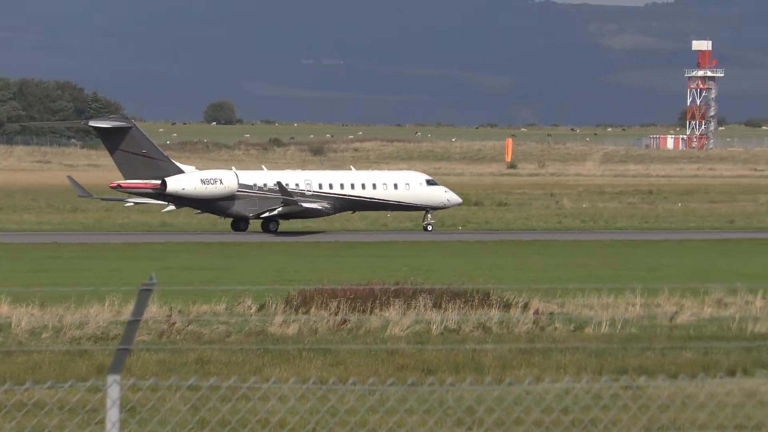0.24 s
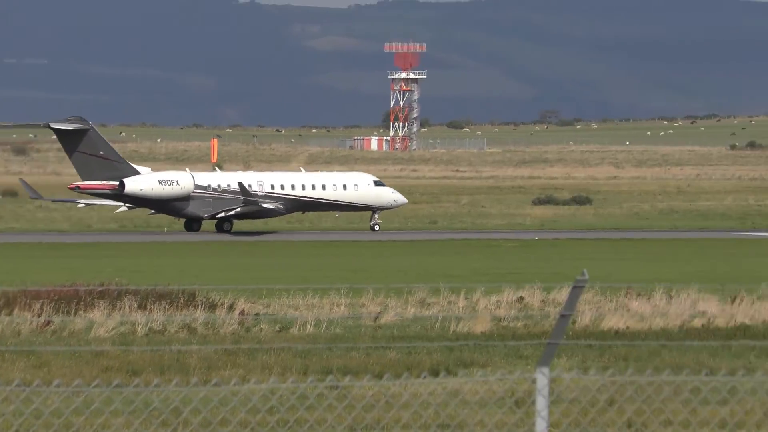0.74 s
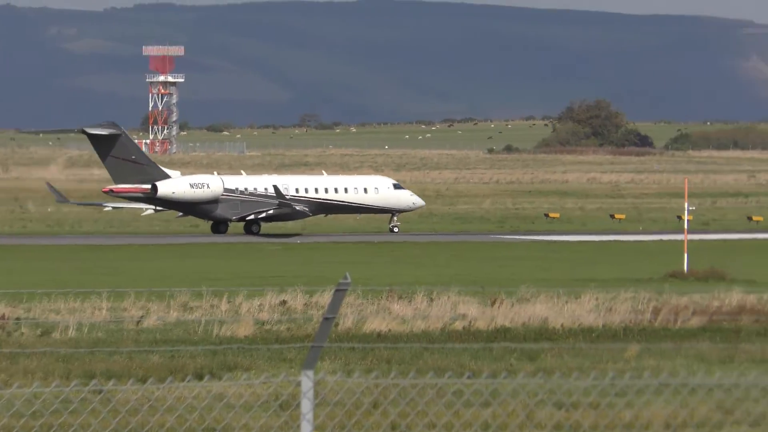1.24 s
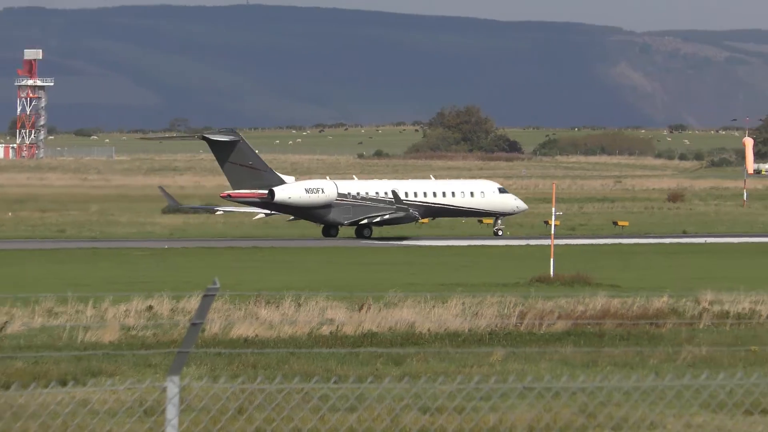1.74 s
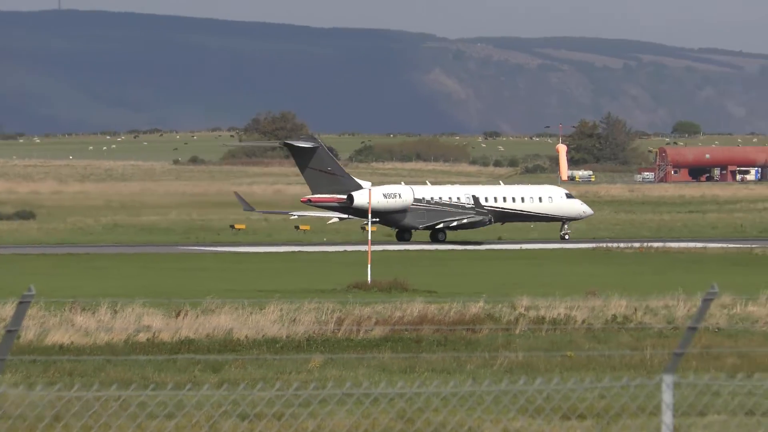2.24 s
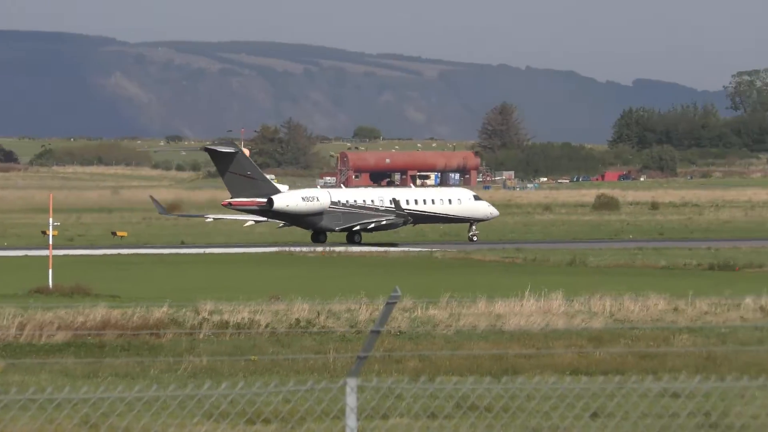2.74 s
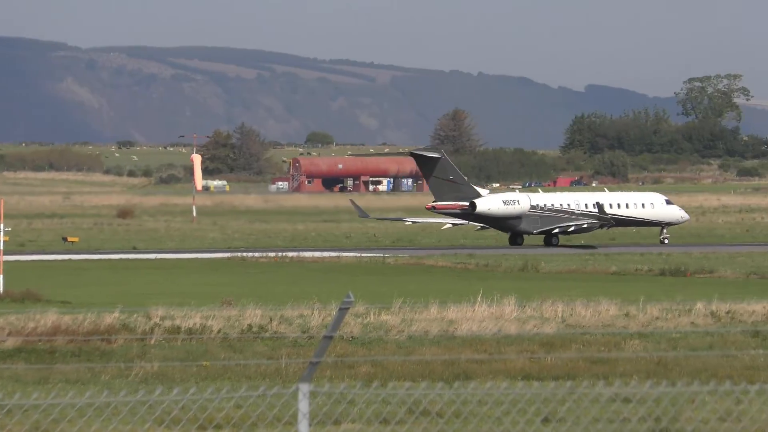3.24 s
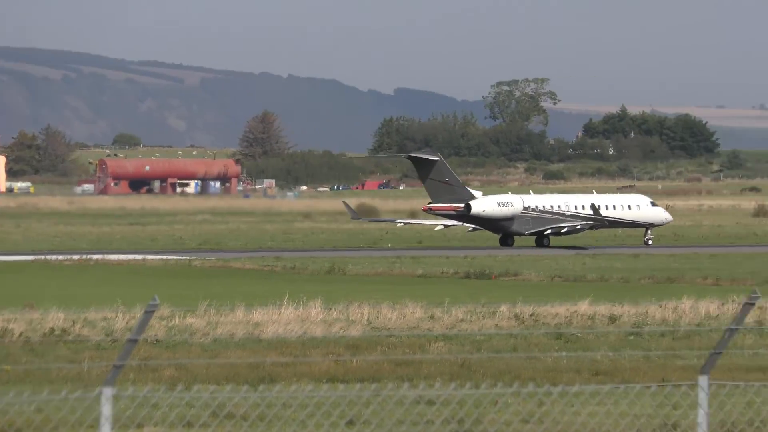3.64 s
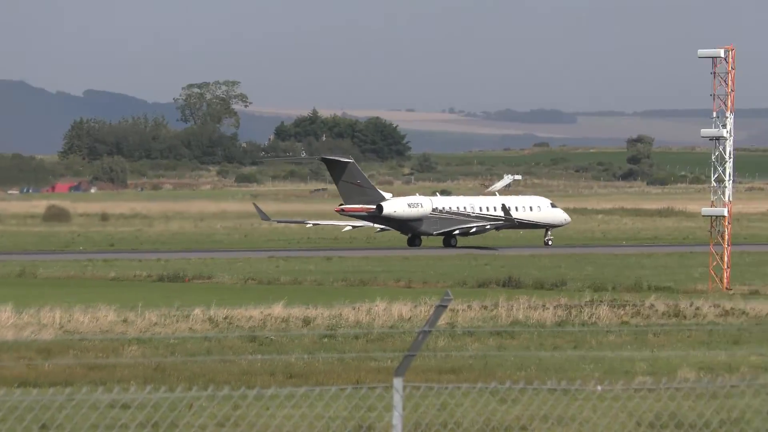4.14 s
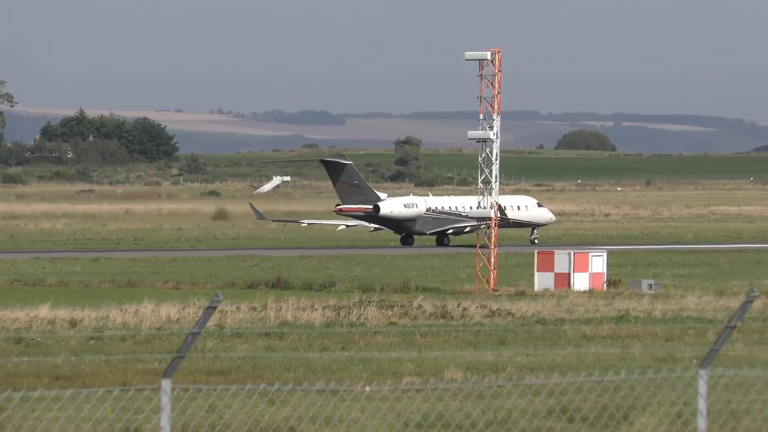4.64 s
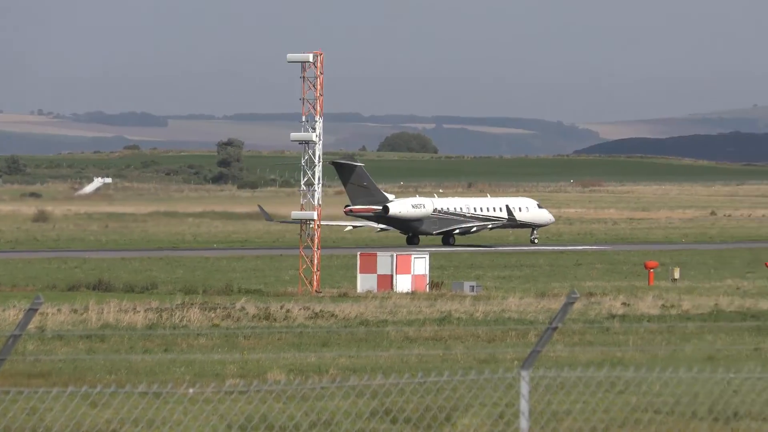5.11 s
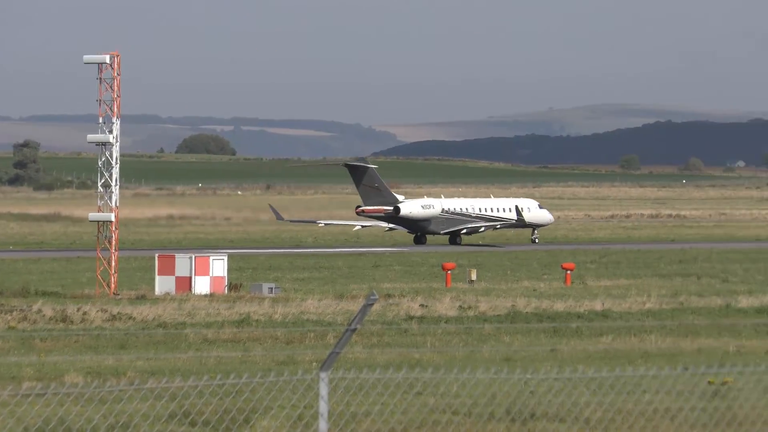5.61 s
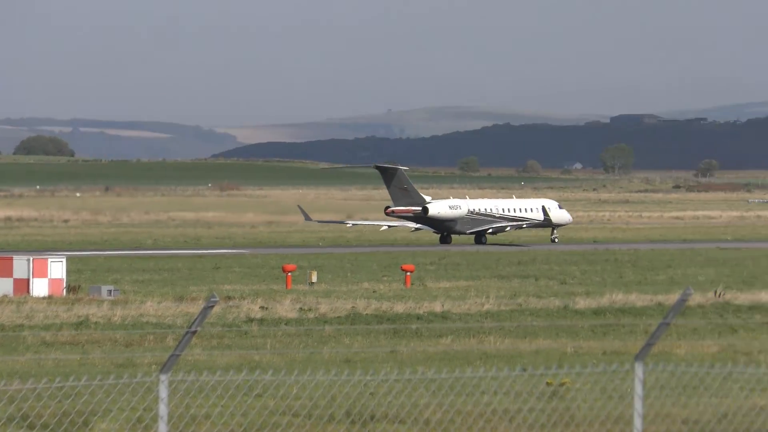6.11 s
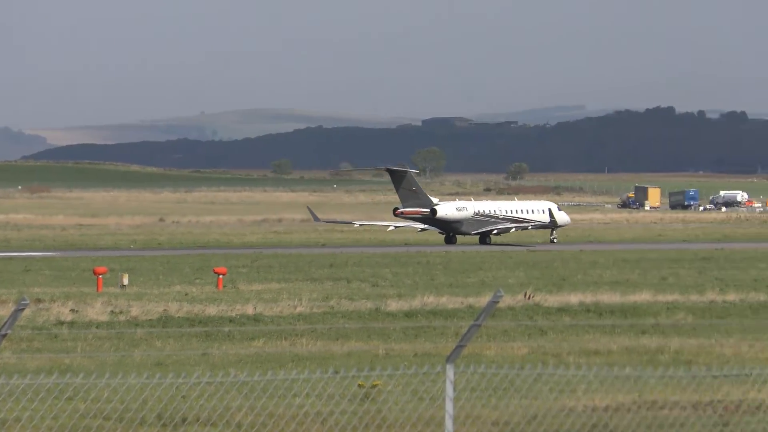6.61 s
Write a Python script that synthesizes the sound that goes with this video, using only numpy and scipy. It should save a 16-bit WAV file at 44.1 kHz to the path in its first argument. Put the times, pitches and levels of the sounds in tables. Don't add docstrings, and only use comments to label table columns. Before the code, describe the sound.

Harsh, distorted jet exhaust roar swells and sags in the wind, a faint fan whine fading as the aircraft draws away over grass.

```python
import sys
import numpy as np
from scipy import signal
from scipy.fft import rfft, irfft, next_fast_len
from scipy.io import wavfile
from scipy.ndimage import uniform_filter1d

SR = 44100
rng = np.random.default_rng(int(sys.argv[2]) if len(sys.argv) > 2 else 0)


def to_wav(s):
    ch = np.atleast_2d(s).T
    pcm = np.round(np.clip(ch, -1, 1) * 32767)
    wavfile.write(sys.argv[1], SR, pcm.astype(np.int16))


def level_to_linear(level):
    exponent = np.asarray(level, float) / 20
    return 10 ** exponent


N = 302526

LAYER_HZ = [
    70,
    155,
    350,
    720,
    1150,
    2300,
    5000,
    8500,
]


def exhaust(gains_db, patchy_db, flicker_db):
    # (pitch [Hz], level [dB per Hz])
    spectrum = [(20, -17.5), (59, 2.5), (88, -4), (110, -16), (150, -16), (250, -13.5), (490, -12),
                (900, -9.5), (2000, -14.5), (2600, -15), (3000, -25), (3660, -34), (5250, -43.5),
                (8570, -69.5)]
    # (time [s], half length [s], gain [dB], centre [Hz])
    grass_echoes = [(.5, .1, 4, 7000), (.88, .07, 4, 7000), (5.38, .08, 4, 400), (3.45, .08, -2.5, 2200),
                    (2.75, .1, 2.5, 1500), (1.0, 0.11, -3.5, 1050), (2.05, 0.11, -2.5, 1040),
                    (2.75, 0.13, -1.5, 990), (3.75, .08, -3, 1410), (4.3, 0.16, -9, 590),
                    (4.62, 0.11, -5, 1120), (5.25, 0.062, -8.5, 710), (6.35, .15, -6, 850),
                    (6.35, 0.12, -8, 2000), (6.7, 0.16, -6, 690)]
    size = next_fast_len(N)
    hz = np.maximum(np.arange(size // 2 + 1) * SR / size, 1)
    points = np.array(spectrum)
    shape_db = np.interp(np.log(hz), np.log(points[:, 0]), points[:, 1])
    shape_db -= 160 * np.maximum(np.log2(hz / points[-1, 0]), 0)
    shape_db -= 18 * np.maximum(np.log2(points[0, 0] / hz), 0)
    noise = rfft(rng.standard_normal(size)) * level_to_linear(shape_db)

    centres = 25 * 2 ** np.arange(0, 9, 1 / 3)
    echoes_db = eddies(grass_echoes, centres, octaves=0.18)
    out = 0
    below = drift(1.5)
    for k, centre in enumerate(centres):
        share = np.interp(np.log(hz), np.log(centres), np.arange(len(centres)) == k)
        place = np.interp(np.log(centre), np.log(LAYER_HZ), np.arange(len(LAYER_HZ)))
        low = min(int(place), len(LAYER_HZ) - 2)
        gain_db = gains_db[low] + (place - low) * (gains_db[low + 1] - gains_db[low])
        above = drift(3.64)
        gain_db = gain_db + echoes_db[k] + patchy_db * (below + above) + flicker_db * drift(11)
        out = out + level_to_linear(gain_db) * irfft(noise * share, size)[:N]
        below = above
    return out


def fan(upper_db):
    # (time [s], pitch [Hz], level against the upper roar [dB])
    whine = [(0, 2585, -14), (.8, 2572, -11), (1.5, 2555, -14), (2.4, 2535, -15), (3, 2520, -19),
             (3.5, 2515, -22), (6.86, 2500, -28)]
    hz, level_db = in_time(whine)
    tones = 0
    for apart_hz in (-6, 7):
        waver = level_to_linear(3.4 * drift(16))
        pitch_hz = hz + apart_hz + 4 * drift(25)
        tones = tones + waver * np.sin(2 * np.pi * np.cumsum(pitch_hz) / SR)
    return level_to_linear(upper_db + level_db) * rms_one(tones)


def eddies(rows, band_hz, octaves):
    s, half_s, gain_db, centre_hz = np.transpose(rows)[:, :, None]
    reach = np.exp(-0.5 * (np.log2(np.array(band_hz) / centre_hz) / octaves) ** 2)
    coarse = np.arange(0, N + 64, 64) / SR
    bells = gain_db * np.exp(-0.5 * ((coarse - s) / half_s) ** 2)
    bands = reach.T @ bells
    return np.array([np.interp(np.arange(N) / SR, coarse, band) for band in bands])


def drift(rate):
    r = np.exp(-80 * np.pi * rate / SR)
    slow = signal.lfilter([1], [1, -2 * r, r * r], rng.standard_normal(N // 40 + 2002))
    slow = slow[2000:]
    return np.interp(np.arange(N) / 40, np.arange(len(slow)), rms_one(slow))


def rms_one(x):
    return x / np.sqrt(np.mean(x ** 2) + 1e-20)


def in_time(rows):
    s, *columns = np.transpose(rows)
    return [np.interp(np.arange(N) / SR, s, c) for c in columns]


def scene():
    # (time [s], level [dB], dullness as mid over upper roar [dB])
    air = [(0, -11.5, -2), (.55, -11.5, -2.5), (.77, -13, -5.5), (1.07, -12, 6.5), (1.3, -8, 1.5),
           (1.55, -11, 2.5), (1.93, -16, 2), (2.16, -23, -3.5), (2.42, -21, -3.5), (2.72, -22, -11.5),
           (3.1, -15.5, -2.5), (3.42, -19, -2.5), (3.8, -25.5, -4), (4.13, -22, -4), (5.0, -22, -2.5),
           (5.58, -16, -2.5), (5.9, -21, -5.5), (6.86, -20.5, 3.8)]
    # (time [s], half length [s], gain [dB], centre [Hz])
    big_eddies = [(.5, 0.18, 5, 155), (.5, 0.21, 5, 715), (0.644, 0.22, -3, 349), (0.483, 0.047, 8.5, 6570),
                  (1.007, 0.16, 4, 555), (1.3, 0.23, 5, 350), (1.4, 0.07, 4.5, 5020),
                  (1.458, 0.24, -6.5, 156), (1.904, .12, -1.5, 5000), (2.35, 0.18, 4, 354),
                  (2.554, 0.046, 5.5, 2350), (3.1, 0.12, -5, 720), (2.854, 0.079, -6, 5500),
                  (4.1, 0.35, 4.5, 6500), (4.303, .4, 10.5, 155), (4.292, 0.09, -3.5, 2000),
                  (4.576, 0.26, 4, 2310), (4.698, .15, 0.5, 5000), (5.1, .1, 5.5, 155),
                  (6.7, .15, 0.5, 59.6), (5.173, 0.044, -0.5, 1150), (5.337, 0.044, 1, 300),
                  (5.595, .12, 5.5, 720), (5.5, 0.19, 2, 8500), (5.605, 0.19, -4, 5120),
                  (5.683, 0.21, -8.5, 293), (6.116, 0.13, -4.5, 155), (6.303, 0.16, -8.5, 7500),
                  (5.56, 0.038, 3, 1790), (6.5, 0.65, -4, 732), (6.838, 0.17, 7, 155)]
    # (time [s], half length [s], gain [dB])
    surges = [(0.049, 0.11, 5.5), (3.05, 0.069, -1), (3.423, 0.042, 3), (3.65, 0.078, 1), (4.244, 0.22, 4),
              (4.43, 0.016, 7), (4.82, .12, 0.5), (5.34, 0.067, 6.5), (5.424, .05, 6.5), (5.66, 0.031, -6),
              (5.872, .05, -8.5), (5.97, 0.033, 3.5), (6.296, .025, -9), (6.393, .05, 7)]
    t = np.arange(N) / SR
    carried_db, dull_db = in_time(air)
    rumble_db = -30.5 + 1.5 * t
    low_db = -18 - 0.3955 * t
    mid_db = carried_db + dull_db / 2 - 1.75
    upper_db = carried_db - dull_db / 2
    dip_db = (rumble_db + low_db) / 2 - 6.5
    shadow_db = (low_db + mid_db) / 2 - 2
    hiss_db = upper_db + 0.65
    top_db = upper_db - 1.8 * t

    rumble_surges = [(*row, LAYER_HZ[0]) for row in surges]
    passing_db = eddies(big_eddies + rumble_surges, LAYER_HZ, octaves=0.53)
    gains_db = passing_db + [rumble_db, dip_db, low_db, shadow_db, mid_db, upper_db, hiss_db, top_db]
    roar = level_to_linear(25.5) * exhaust(gains_db, patchy_db=0.44, flicker_db=0.97)
    return (roar + fan(upper_db))[None]


def ceiling():
    # (start [s], length [s], ceiling [dB])
    overloads = [(0, 2.04, -7.6), (2.42, .06, -7.6), (2.48, .12, -5.6), (2.84, .06, -8.5),
                 (2.95, .05, -6.2), (3.0, .26, -7.4), (3.26, .27, -6.1), (5.525, .115, -7.5),
                 (5.64, .11, -6.9), (6.0, .004, -9.6)]
    open_db, attack_db_per_s, recover_db_per_s = -1, 250, 90
    t = np.arange(N) / SR
    held_db = []
    for s, length, db in overloads:
        before_db = attack_db_per_s * (s - t)
        after_db = recover_db_per_s * (t - s - length)
        held_db.append(db + np.maximum(np.maximum(before_db, after_db), 0))
    return level_to_linear(np.minimum(np.min(held_db, axis=0), open_db))


def roll_off(x):
    return signal.sosfilt(signal.butter(12, 15750, fs=SR, output="sos"), x)


def record(dry):
    top, knee = ceiling(), 22
    clipped = dry / (1 + (np.abs(dry) / top) ** knee) ** (1 / knee)
    overload = uniform_filter1d(uniform_filter1d(np.abs(dry - clipped), size=3000), size=2200)
    sagging = clipped - 0.9 * (overload - overload.mean())
    presence = 0.16
    bright = signal.lfilter([1 + presence, -presence], [1], sagging)
    cut = signal.sosfilt(signal.cheby2(14, 50, 16100, fs=SR, output="sos"), bright)
    soft_end = np.sin(np.pi / 2 * np.minimum(np.arange(N)[::-1] / 200, 1)) ** 2
    return roll_off(cut * soft_end)


dry = scene()
out = record(dry)
to_wav(out)
```